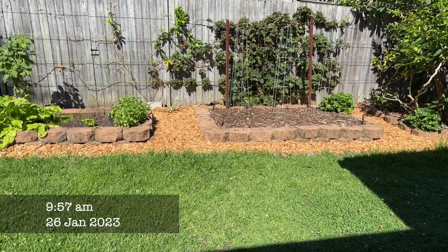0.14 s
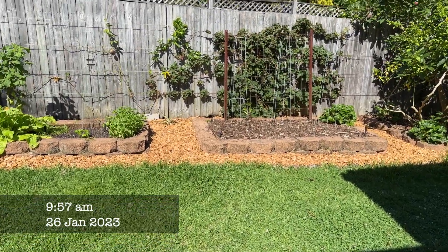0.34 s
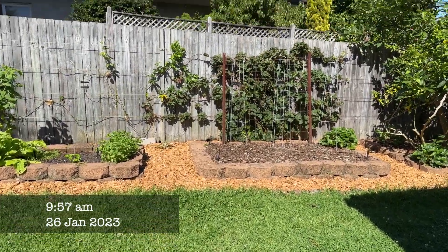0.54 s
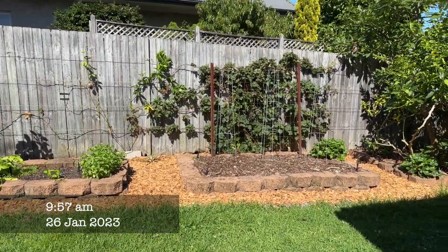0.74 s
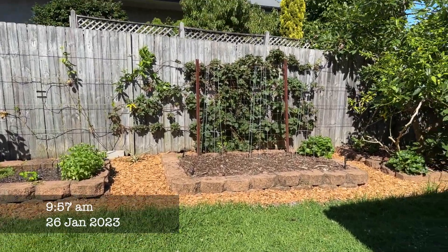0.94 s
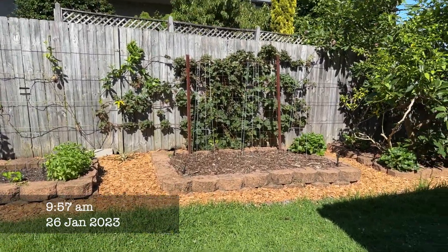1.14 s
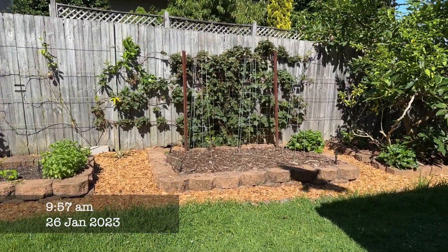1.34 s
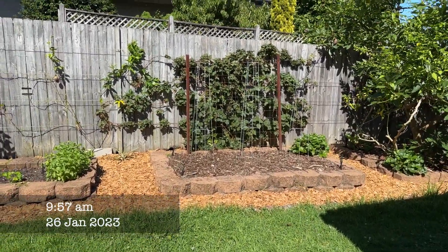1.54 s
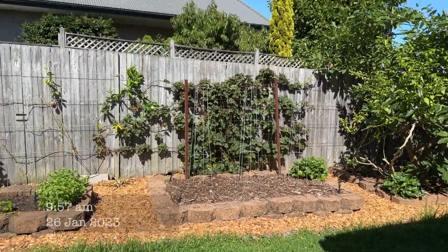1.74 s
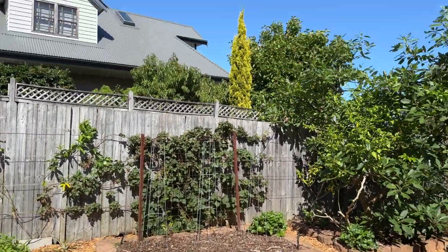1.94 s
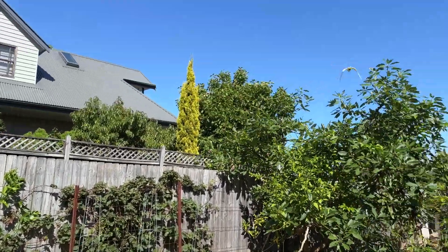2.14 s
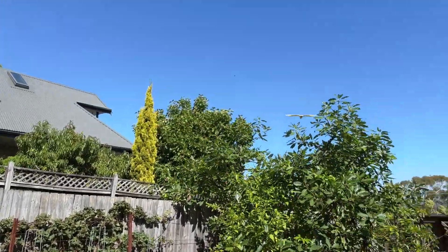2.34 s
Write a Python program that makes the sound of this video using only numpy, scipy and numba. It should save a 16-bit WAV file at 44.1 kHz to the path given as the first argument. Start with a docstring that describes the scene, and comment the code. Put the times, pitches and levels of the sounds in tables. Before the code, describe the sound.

Two loud, rasping screeches come from a cockatoo passing over a fenced garden, the second a little louder. Each leaves a short echo, with a quiet suburban hush and faint wind rumble on the microphone underneath.

```python
"""Over a quiet suburban hush, a cockatoo screeches twice as it flies across a fenced back garden.
Its syrinx snaps chaotically into a throat whose resonances rise as each call opens out. Brief squeals
colour both calls and a broad bark ends the first. Ground, fence and houses throw the sound back.
A soft thud falls under the first screech; a light breeze buffets the microphone."""
import sys
import numpy as np
from scipy import signal
from scipy.fft import rfft, irfft
from scipy.io import wavfile
from scipy.ndimage import uniform_filter1d, map_coordinates
from numba import njit

SR = 44100
rng = np.random.default_rng(int(sys.argv[2]) if len(sys.argv) > 2 else 0)


def persist_wave(psi):
    """Save psi, clipped to +-1, as 16-bit WAV."""
    counts = np.round(np.clip(psi, -1, 1) * 32767).astype(np.int16)
    wavfile.write(sys.argv[1], SR, np.atleast_2d(counts).T)


N = 105090
T = np.arange(N) / SR


def from_db(db):
    """Decibels to gain."""
    return 10 ** (np.asarray(db) / 20)


def rms_one(x):
    """Scale to unit power."""
    return x / np.sqrt(np.mean(x ** 2) + 1e-20)


def evened(x, samples):
    """Hold unit power over a sliding window."""
    return x / np.sqrt(uniform_filter1d(uniform_filter1d(x ** 2, samples), samples) + 1e-12)


def in_time(rows):
    """Columns of a time table at every sample."""
    times_s, *columns = np.transpose(rows)
    return [np.interp(T, times_s, c) for c in columns]


def at_hz(rows, hz):
    """Columns of a spectrum table at hz, on a log axis."""
    rows_hz, *columns = np.transpose(rows)
    return [np.interp(np.log(hz + 1e-9), np.log(rows_hz), c) for c in columns]


def swell(peak_s, sigma_s):
    """Gaussian rise and fall."""
    return np.exp(-.5 * ((T - peak_s) / sigma_s) ** 2)


def wobble(rate_hz):
    """Slow random motion, unit RMS."""
    lowpass = signal.butter(2, rate_hz, fs=SR, output="sos")
    return rms_one(signal.sosfilt(lowpass, rng.standard_normal(N)))


@njit
def sweep(x, w, a):
    """Two-pole band-pass, unit peak gain; centre w and half width a in rad/sample."""
    y = np.zeros(len(x))
    for i in range(2, len(x)):
        y[i] = (a * (x[i] - x[i - 2]) + 2 * np.cos(w[i]) * y[i - 1] - (1 - a) * y[i - 2]) / (1 + a)
    return y


def resonance(x, hz, width_hz):
    """One resonance, steady or gliding."""
    return sweep(x, 2 * np.pi * hz / SR * np.ones(N), np.pi * width_hz / SR)


def steep(x, hz, width_hz):
    """A resonance applied twice for steep skirts; width is per pass."""
    return resonance(resonance(x, hz, width_hz), hz, width_hz)


def noise_band(hz, width_hz, samples):
    """Band of noise held at unit power."""
    return evened(steep(rng.standard_normal(N), hz, width_hz), samples)


def background():
    """Smooth hush of far traffic and leaves."""
    # noise spectrum: f/Hz, relative density/dB
    spectrum = [(25, -6.5), (100, 1.5), (200, -7.5), (400, -11), (900, -11), (1500, -17.5), (2600, -19),
                (3500, -13.5), (4400, -20.5), (5200, -21.5), (6200, -31.5), (10000, -34), (14000, -37),
                (16000, -35)]
    density_db, = at_hz(spectrum, np.fft.rfftfreq(N, 1 / SR))
    hush = irfft(rfft(rng.standard_normal(N)) * from_db(density_db), N)
    return from_db(-58) * rms_one(hush)


def syrinx(start_s):
    """Snaps of uneven spacing and strength, each followed by a spurt of turbulence."""
    snaps_per_s, jitter, spread_db = 310, 0.3, 0.5
    air_db, air_build_s, air_decay_s, air_floor = -1.5, 0.03, 0.0032, 0.24
    gap_draws, level_draws = rng.standard_normal((2000, 2)).T
    onsets = (np.cumsum(np.exp(jitter * gap_draws)) / snaps_per_s * SR).astype(int)
    inside = onsets < N
    snaps = np.zeros(N)
    snaps[onsets[inside]] = from_db(spread_db * np.clip(level_draws[inside], -2, 2))
    spurts = rms_one(signal.lfilter([1], [1, -np.exp(-1 / (air_decay_s * SR))], snaps))
    turbulence = rms_one((spurts + air_floor) * rng.standard_normal(N))
    build_up = 1 - np.exp(-np.maximum(T - start_s, 0) / air_build_s)
    return rms_one(snaps) + from_db(air_db) * build_up * turbulence


def overtones(x):
    """The vibration partly repeats after a drifting period, adding faint gliding overtones."""
    spacing_hz, repeat_gain, swing, swing_hz = 397.8, 0.32, 0.0868, 3.93
    period_s = np.exp(swing * wobble(swing_hz)) / spacing_hz
    return x + repeat_gain * map_coordinates(x, [(T - period_s) * SR], order=3)


def quiver(hz):
    """The throat trembles: a resonance wanders about hz, its swing capped above knee_hz."""
    depth, knee_hz = 0.037, 3130
    return hz + depth * min(hz, knee_hz) * wobble(rate_hz=23.5)


def screech(levels, shape, throat):
    """The syrinx drives five registers of gliding resonances, cut by a rising antiresonance."""
    # trim per register, low to treble: gain/dB
    trims_db = [-2.07, -0.93, -1.63, 0.36, -1.36]
    attack_s, release_s, notch_depth = 0.011, 0.0045, 0.78
    start_s, end_s = levels[0][0], levels[-1][0]
    core_db, low_db, edge_db, rasp_db, treble_db = in_time(levels)
    stretch, notch_hz = in_time(shape)
    source = overtones(syrinx(start_s))
    source = source - notch_depth * resonance(source, notch_hz, width_hz=4000)
    call = 0
    for modes, offset_db, trim_db in zip(throat, (low_db, 0, edge_db, rasp_db, treble_db), trims_db):
        register = 0
        for k, (hz, width_hz, db) in enumerate(modes):
            ring = steep(source, quiver(hz) * stretch, width_hz)
            register += (-1) ** k * from_db(db) / np.sqrt(width_hz) * ring
        call += from_db(core_db + offset_db + trim_db) * evened(register, samples=600)
    return call * np.exp(np.minimum(T - start_s, 0) / attack_s - np.maximum(T - end_s, 0) / release_s)


def cockatoo():
    """Two screeches, each with its own throat. Registers: low, core, edge, rasp, treble."""
    # call envelope before trim: t/s, core level/dB, then low, edge, rasp, treble/dB re core
    first_levels = [(0.025, -48.5, -3.5, -13, -16, -19), (0.083, -37, -9, -12, -18, -37),
                    (0.123, -34.5, -6, -9.5, -22, -26), (0.213, -34.5, -10, -9, -14.5, -26),
                    (0.285, -26.5, -10, -5, -10.5, -20.5), (0.489, -27.5, -10.5, -5, -11, -22),
                    (0.533, -24.5, -11, -13, -13.5, -29), (0.567, -28.5, -11, -5, -6.5, -20),
                    (0.585, -26.5, -12, -4, -14, -28), (0.679, -29, -6, -9, -13, -23.5),
                    (0.701, -27.5, -11, -11, -12.5, -27), (0.729, -24.5, -21, -7, -12, -20.5),
                    (0.745, -33.5, -16, -7, -5, -28)]
    second_levels = [(1.262, -55.5, 7.5, -2, -15, -26), (1.276, -31, 1, -17, -24, -23),
                     (1.3, -24.5, -11, -17, -26, -21.5), (1.364, -25, -4, -6, -16.5, -20),
                     (1.402, -21, -14.5, -8.5, -16.5, -27.5), (1.444, -27, -7, -5, -13, -16.5),
                     (1.536, -22, -12, -13.5, -24, -24.5), (1.562, -22, -10.5, -0.5, -14.5, -17.5),
                     (1.676, -27, -4.5, -10.5, -15.5, -28.5), (1.746, -27.5, -4, -2, -7.5, -19.5),
                     (1.756, -24, -8.5, -4.5, -24, -31), (1.782, -25, -5.5, -4.5, -9.5, -23.5),
                     (1.864, -26.5, -7.5, -8, -22, -33.5), (1.986, -32.5, -0.5, -8, -6.5, -21.5),
                     (1.995, -28.5, -6, -15, -17, -26)]
    # throat motion: t/s, resonance stretch/ratio, antiresonance/Hz
    first_shape = [(.02, 0.77, 5400), (.13, 0.96, 5940), (.3, .99, 6750), (.51, 1.056, 7600),
                   (.57, 0.996, 9000), (.75, 1.024, 7750)]
    second_shape = [(1.27, 0.86, 4320), (1.35, .97, 5070), (1.41, 0.98, 6230), (1.52, 0.98, 6200),
                    (1.618, 1.026, 6600), (1.79, 0.96, 7440), (2.0, 0.995, 7320)]
    # throat resonances, one list per register: unstretched f/Hz, width/Hz, relative level/dB
    first_throat = [
        [(435, 214, -12), (642, 130, -3), (867, 195, 4.5), (1100, 190, -5.5)],
        [(1385, 410, -9), (1894, 470, 0.5), (2670, 800, 1.5)],
        [(3360, 650, 0)],
        [(4630, 730, 2), (6100, 300, -10.5)],
        [(7300, 930, 4.5), (8960, 480, -0.5), (9970, 740, -3.5), (11500, 1800, -9), (14200, 3100, -11.5)],
    ]
    second_throat = [
        [(419, 128, -18.5), (581, 153, -9), (871, 314, 4), (1060, 170, -5.5)],
        [(1277, 360, -8), (1783, 420, 3), (2507, 740, 7)],
        [(3220, 670, 0)],
        [(4460, 510, -10.5), (5840, 1400, -21)],
        [(7250, 590, 5.5), (8580, 1200, 0.5), (9880, 540, -5.5), (11330, 2100, -11.5), (14400, 3200, -13.5)],
    ]
    first = screech(first_levels, first_shape, first_throat)
    return first + screech(second_levels, second_shape, second_throat)


def echoes(x):
    """Dull reflections whose paths lengthen or shorten as the bird flies."""
    # ground, fence and houses: initial delay/s, gain/dB
    reflections = [(.0063, -13), (.0185, -9), (.036, -15), (.058, -14), (.135, -25)]
    cutoff_hz, drift_s_per_s = 13000, 0.0025
    dull = signal.lfilter(*signal.butter(1, cutoff_hz, fs=SR), x)
    reflected = 0
    for k, (initial_s, db) in enumerate(reflections):
        delay_s = initial_s + (-1) ** k * drift_s_per_s * T
        reflected += from_db(db) * map_coordinates(dull, [(T - delay_s) * SR], order=3)
    return reflected


def garden(x):
    """A diffuse tail that dies band by band; each stretch of the flight excites a different one."""
    # scattered sound: f/Hz, level/dB, T60/s
    scatter = [(316, -13, 0.99), (740, -14.5, 0.53), (1400, -3, 0.54), (1900, -13, 0.69), (3570, -7.5, 0.5),
               (6000, -10.5, 0.51), (10100, -5.5, 0.4), (15000, -13, 0.51)]
    tail_s, build_s = T[:SR * 3 // 4], 0.0037
    edges_hz = np.geomspace(200, 16000, 13)
    centres_s, step_s = np.linspace(0, T[-1], 20, retstep=True)
    responses = 0
    for low_hz, high_hz in zip(edges_hz, edges_hz[1:]):
        db, t60_s = at_hz(scatter, np.sqrt(low_hz * high_hz))
        decay = from_db(-60 * tail_s / t60_s) * (1 - np.exp(-tail_s / build_s))
        tails = rng.standard_normal((len(centres_s), len(tail_s))) * decay / np.linalg.norm(decay)
        band = signal.butter(2, [low_hz, high_hz], "band", fs=SR, output="sos")
        responses += from_db(db) * signal.sosfilt(band, tails)
    diffuse = 0
    for centre_s, response in zip(centres_s, responses):
        crossfade = np.sqrt(np.maximum(1 - abs(T - centre_s) / step_s, 0))
        diffuse += signal.fftconvolve(x * crossfade, response)[:N]
    return diffuse


def squeals_and_bark():
    """Brief narrow squeals, plus a broad bark that ends the first screech; direct sound and send."""
    # squeals, bark at 0.734 s: t/s, sigma/s, f/Hz, glide/(Hz/s), width/Hz, level/dB, send gain/dB
    bursts = [(0.14, 0.062, 7380, 2600, 380, -60, -6), (0.17, .05, 4540, 1500, 170, -49.5, 2),
              (0.15, 0.021, 3540, 0, 140, -45, -6), (0.491, 0.042, 2530, -4200, 200, -28, 1),
              (.708, 0.023, 1932, 0, 159, -26.5, -3), (0.734, .012, 1240, 6, 805, -35.5, 5.5),
              (0.73, 0.027, 550, 5, 233, -45, 2), (1.332, 0.031, 6500, 7000, 1200, -47.5, -6),
              (1.485, 0.043, 4500, -4, 200, -41.5, -3), (1.788, 0.012, 3510, 3, 200, -29, -10),
              (1.842, 0.063, 4290, 2900, 109, -40.5, -7), (1.987, 0.0042, 1077, 2, 109, -28.5, -8)]
    direct, sent = 0, 0
    for peak_s, sigma_s, hz, glide_hz_per_s, width_hz, db, send_db in bursts:
        centre_hz = hz + glide_hz_per_s * np.clip(T - peak_s, -2 * sigma_s, 2 * sigma_s)
        burst = from_db(db) * swell(peak_s, sigma_s) * noise_band(centre_hz, width_hz, samples=500)
        direct += burst
        sent += from_db(send_db) * burst
    return direct, sent


def thud():
    """One faint, dull bump under the first screech."""
    envelope = from_db(-52.5) * swell(peak_s=0.473, sigma_s=0.03)
    return envelope * noise_band(hz=238, width_hz=73, samples=900)


def breeze():
    """Low rumble of wind on the microphone, swelling with each puff."""
    # puffs of wind: t/s, sigma/s, level/dB
    puffs = [(0.678, 0.023, -52), (.78, 0.018, -52.5), (1.062, 0.051, -50.5), (1.108, 0.014, -44),
             (1.26, 0.012, -37.5), (1.39, 0.16, -53.5), (1.474, 0.0091, -45), (1.765, 0.022, -47.5),
             (1.85, 0.044, -48), (2.097, 0.0053, -51), (2.23, .01, -53)]
    floor_db = -64.5
    puff_power = sum((from_db(db) * swell(peak_s, sigma_s)) ** 2 for peak_s, sigma_s, db in puffs)
    envelope = np.sqrt(from_db(floor_db) ** 2 + puff_power)
    return envelope * noise_band(hz=55, width_hz=48.6, samples=1200)


def scene():
    """The bird, its reflections and the open air, in mono."""
    calls = cockatoo()
    accents, accents_sent = squeals_and_bark()
    radiated = calls + accents_sent
    bird = calls + accents + echoes(radiated) + garden(radiated)
    return (bird + thud() + breeze() + background())[None]


def record(dry):
    """Steep treble cut."""
    cutoff_hz = 15700
    return signal.sosfilt(signal.ellip(12, .1, 80, cutoff_hz, fs=SR, output="sos"), dry)


dry = scene()
out = record(dry)
persist_wave(out)
```